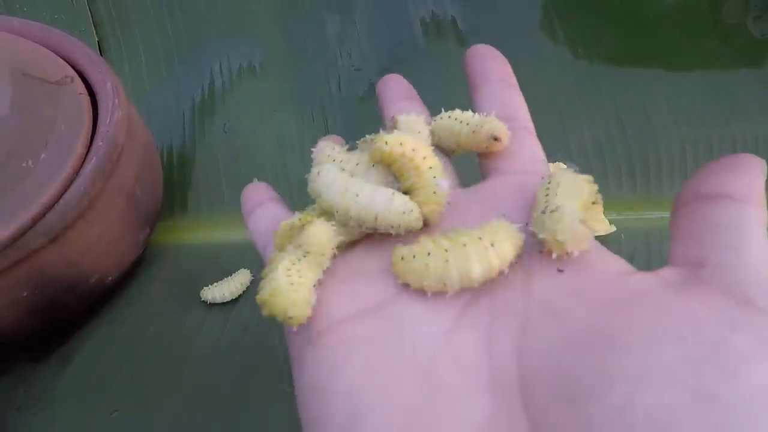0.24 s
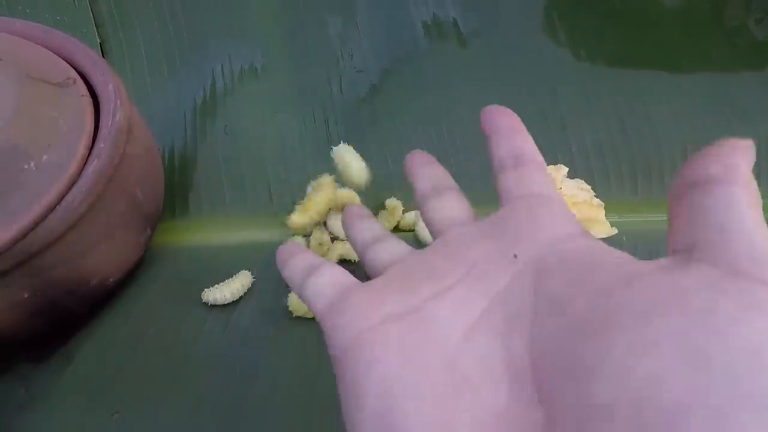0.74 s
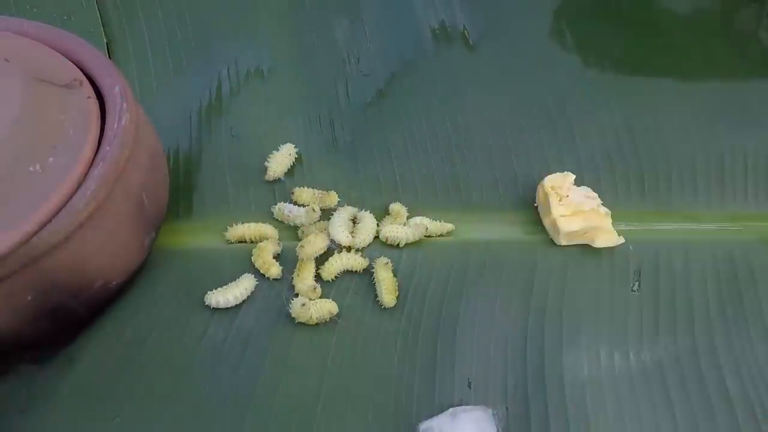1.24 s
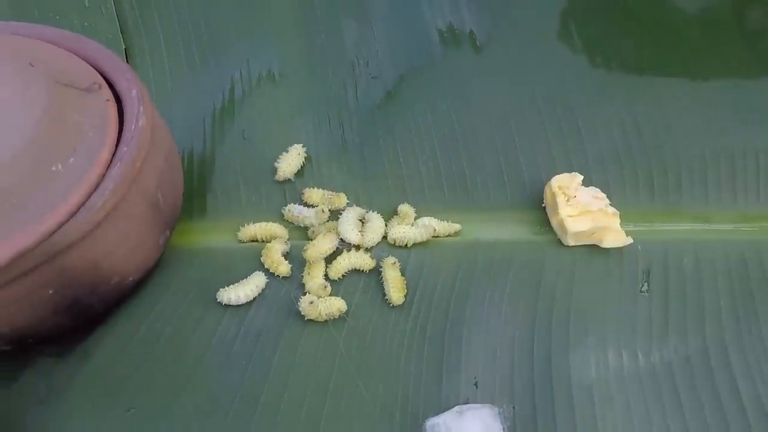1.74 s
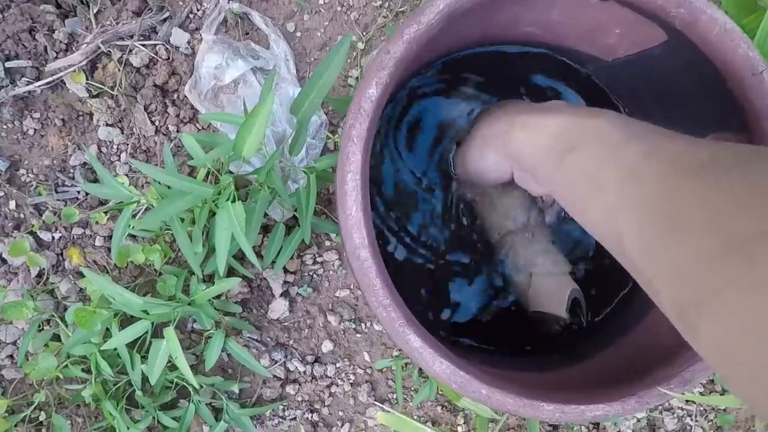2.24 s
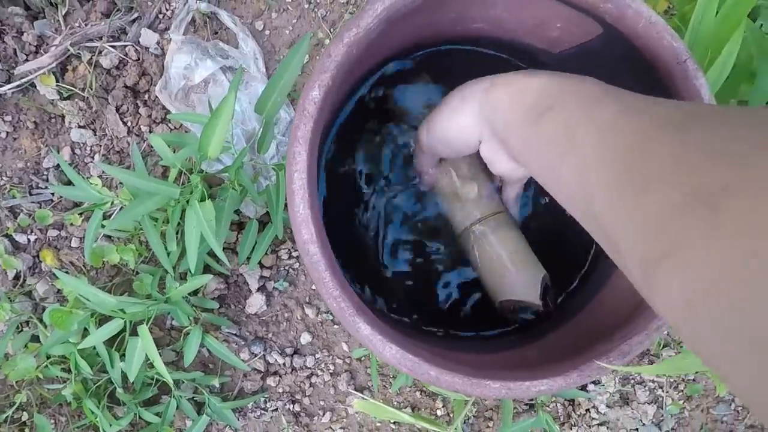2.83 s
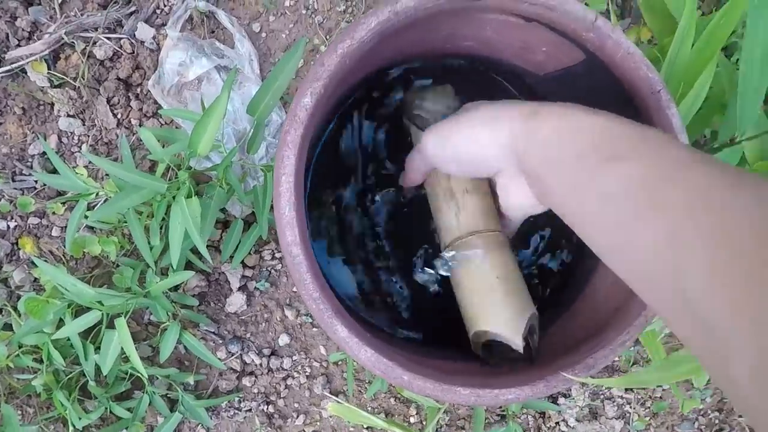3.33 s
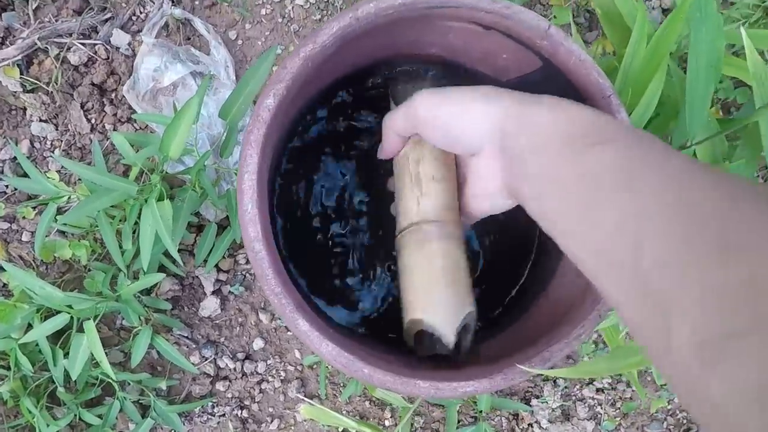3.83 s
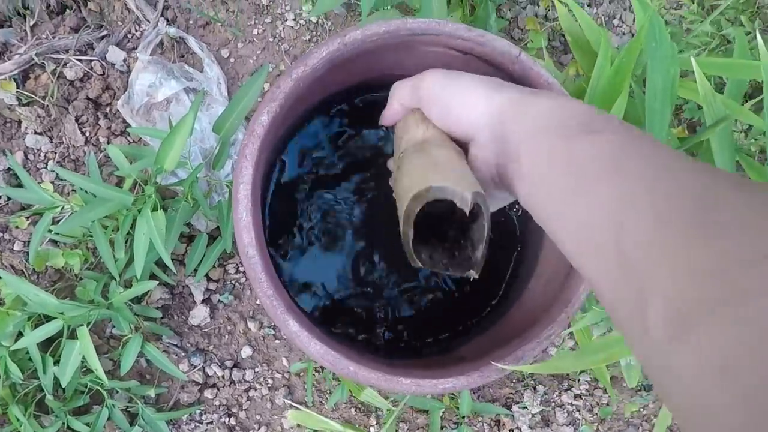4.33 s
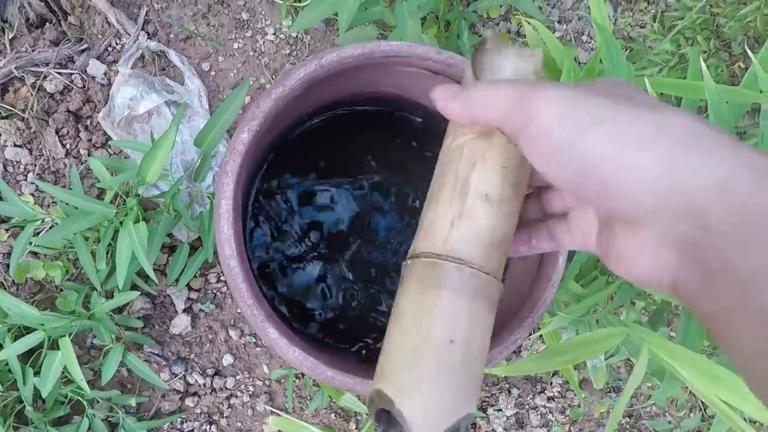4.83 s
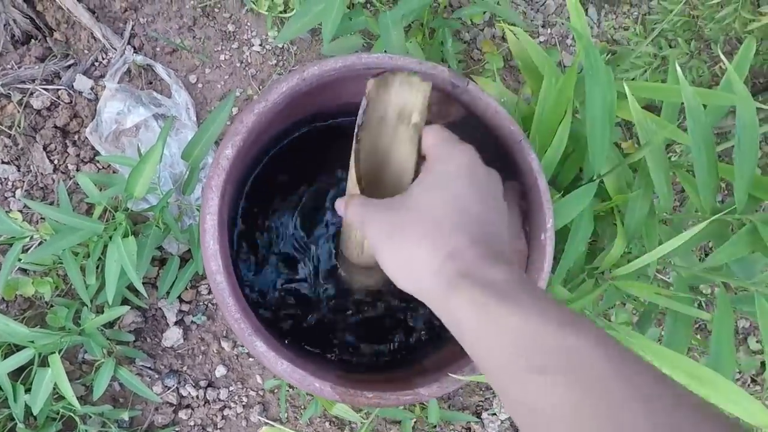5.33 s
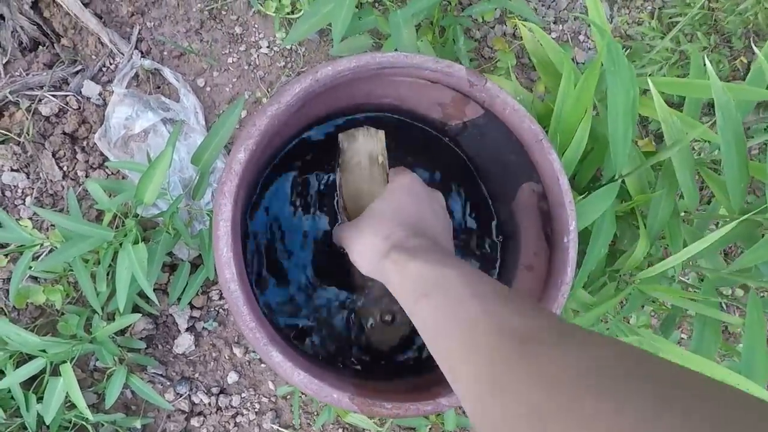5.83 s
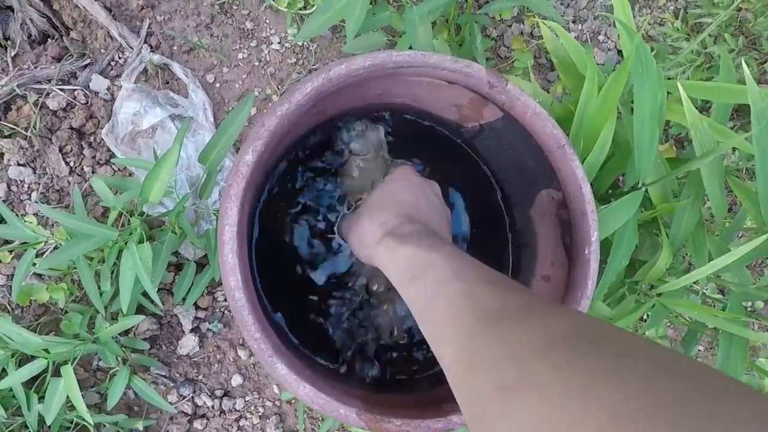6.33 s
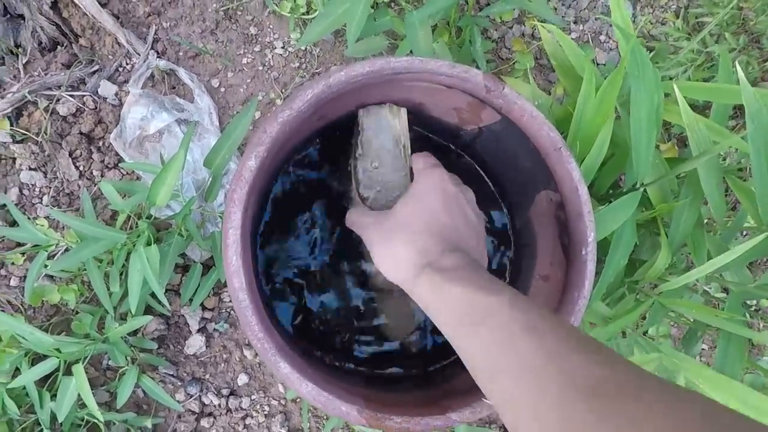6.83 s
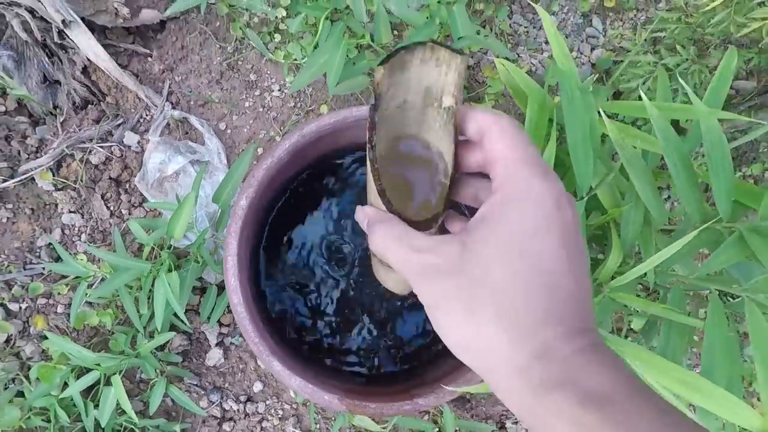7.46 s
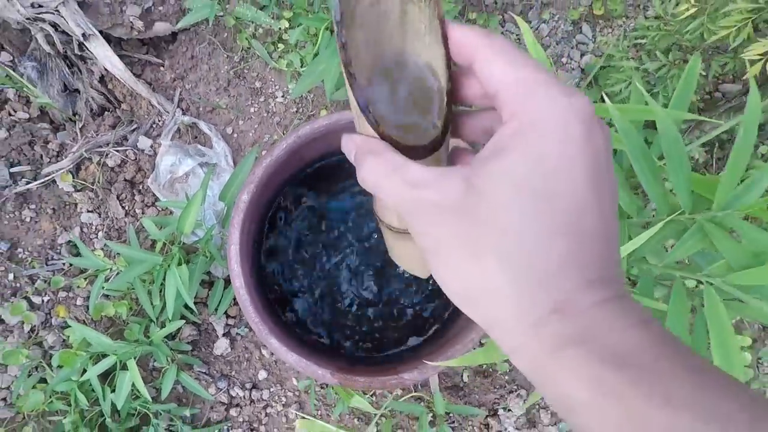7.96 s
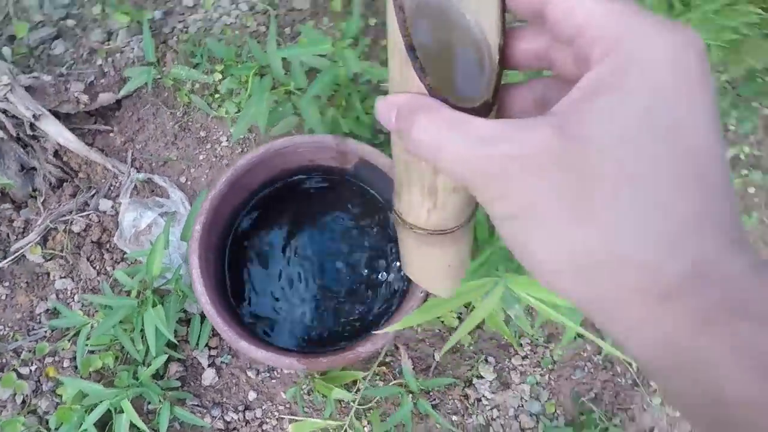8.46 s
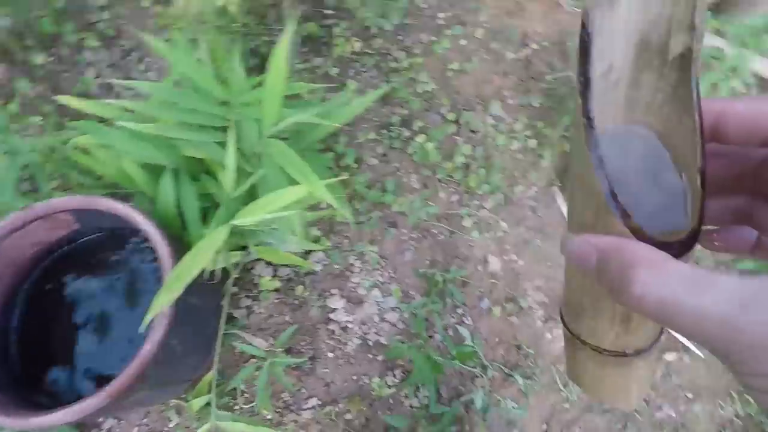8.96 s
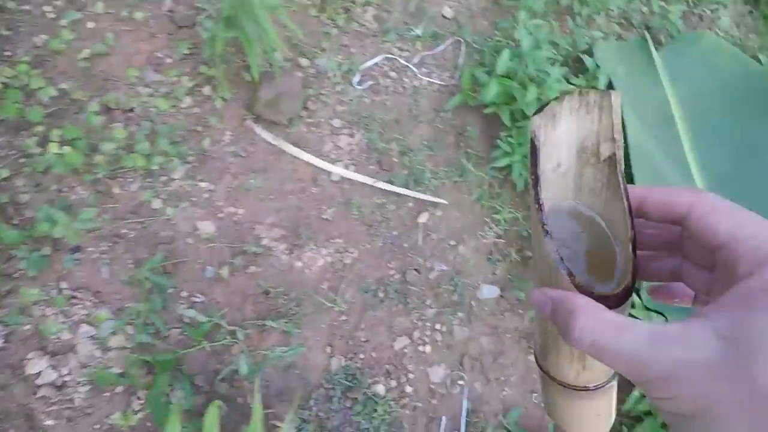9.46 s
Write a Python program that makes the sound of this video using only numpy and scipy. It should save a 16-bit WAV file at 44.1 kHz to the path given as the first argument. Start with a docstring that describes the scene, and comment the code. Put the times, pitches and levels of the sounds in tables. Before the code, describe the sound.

First a steady low hum with a few dull, papery pats on a leaf; it breaks off with a click. Close wet handling follows in a clay pot: hollow bamboo knocks, crisp ticks, plinking drops, then a cluster of rising bubble gulps. A distant engine putters closer behind it. Trickles and drips thin out, leaves swish once, and the engine recedes in open air.

```python
"""Outdoors over far traffic rumble: under a swelling motor hum, grubs pat onto a leaf and leaves rustle (noise
bursts). The scene changes, cutting the hum short, and a hollow drone fades; a bamboo tube knocks and rubs on a
clay pot of water (ringing modes), with short ringing notes and splash clicks, then gulps air (gliding sines) as
it fills, a slow engine drawing near. Lifted out, the tube drips (tiny chirps); leaves rustle once more as the
engine draws away."""
import sys
import numpy as np
from scipy import signal
from scipy.fft import rfft, irfft, next_fast_len
from scipy.io import wavfile

SR = 44100
rng = np.random.default_rng(int(sys.argv[2]) if len(sys.argv) > 2 else 0)


def master_out(mix):
    """Clip the mix to full scale and print it as 16-bit PCM to the path in sys.argv[1]."""
    frames = np.transpose(np.atleast_2d(mix))
    ceiling = np.clip(frames, -1, 1)
    pcm = np.round(ceiling * 32767).astype(np.int16)
    wavfile.write(sys.argv[1], SR, pcm)


N = 427329

# bamboo on clay: start_s, low_modes_peak_db, hardness_db (gain of upper modes), longest_t60_s
KNOCK_EVENTS = [(2.073, -13, -28.5, 0.011), (2.281, -23.5, -22, 0.039), (3.407, -15.5, -8, 0.09),
                (3.778, -24, -5, .08), (4.143, -27, 2, .08), (4.283, -28, -3.5, 0.055),
                (4.651, -9, 4.5, 0.095), (6.965, -20.5, 1, 0.019)]
# modes of tube and pot: mode_hz, level_db, t60_s
BODY_MODES = [(449, 8.5, 0.041), (807, -3, 0.093), (1160, 2.5, 0.0038), (1760, 2, 0.011), (2250, 0, 0.007),
              (2900, -2, 0.011), (3340, -6.5, 0.0085), (3820, -6.5, 0.0098)]
# short water tones, gliding or steady (gulped bubbles and ringing drops):
# start_s, peak_db, start_hz, rise_oct_per_s, life_s
WATER_TONES = [(1.957, -40, 1340, -0.5, 0.042), (1.992, -18.5, 1274, 8, 0.014),
               (2.037, -15, 443, 43, 0.015), (4.007, -24, 2150, -1, 0.0072), (4.19, -32, 763, -0.5, 0.059),
               (5.454, -25, 519, 0.6, 0.051), (5.958, -24.5, 218, 28, 0.047),
               (6.117, -28, 1015, 4.5, 0.055), (6.119, -23.5, 218, -2, 0.037), (6.156, -22, 197, 28, 0.054),
               (6.202, -22, 1154, 15.5, 0.0215), (6.204, -25.5, 2164, 28.5, 0.0096),
               (6.257, -8.5, 456, 43.5, 0.0175), (6.276, -23.5, 920, 79.5, 0.017),
               (6.278, -25, 962, -1, 0.021), (6.309, -21.5, 459, 20, 0.03), (6.349, -28, 943, 19.5, 0.0324),
               (6.38, -19.5, 299, 28.5, 0.066), (6.426, -34, 1000, 9, 0.036),
               (6.43, -12.5, 523, 46.5, 0.018), (6.602, -32, 440, 22, 0.015), (7.18, -20.5, 336, 17, 0.031),
               (7.662, -33.5, 1123, 37, 0.027), (8.331, -37.5, 383, 5, 0.12),
               (8.367, -34.5, 1326, 13.5, 0.034)]
# short ringing notes (drops into water, and the ring of struck pot or tube): start_s, peak_db, pitch_hz
RINGING_NOTES = [(3.409, -16, 1140), (3.628, -22, 1470), (3.699, -36, 1034), (3.734, -37, 2050),
                 (3.78, -39, 1350), (3.802, -31, 1690), (5.216, -36, 930), (5.273, -15, 440),
                 (5.35, -37, 734), (5.447, -19, 2095), (5.675, -35, 808), (6.144, -15, 481),
                 (6.204, -17, 460), (6.205, -26.5, 3560), (6.304, -36, 1605), (6.876, -21, 996),
                 (6.878, -22.5, 1400), (6.911, -36.5, 1454), (7.041, -34.5, 1550), (7.073, -28.5, 1955),
                 (7.087, -35, 2730), (7.136, -33.5, 1835), (7.149, -36, 3680), (7.171, -30.5, 1160),
                 (7.47, -36, 1080), (7.503, -22.5, 601), (7.543, -21.5, 1974)]
# splash clicks; a sharp one may take a second row for its high crack: start_s, peak_db, pitch_hz
TICK_EVENTS = [(1.943, -31.5, 3980), (2.273, -42, 2290), (3.073, -20.5, 3130), (3.2864, -30.5, 3900),
               (3.352, -40, 5900), (3.433, -17, 3300), (3.6046, -22.5, 2980), (3.757, -30, 2050),
               (3.9, -7.5, 3140), (3.9238, -9.5, 3870), (3.9263, -16, 6600), (4.2268, -31, 6000),
               (4.2276, -21, 13500), (4.366, -32.5, 4900), (4.804, -40, 5540), (5.216, -31, 5460),
               (5.444, -23, 2820), (5.549, -37.5, 5860), (6.059, -35.5, 5930), (6.116, -24.5, 3970),
               (6.189, -31, 4200), (6.302, -39.5, 6360), (6.379, -24.5, 2540), (6.506, -29, 5100),
               (6.572, -26, 4400), (6.834, -29, 1890), (6.9115, -25.5, 2900), (6.9632, -30, 2553),
               (7.126, -16.5, 4050), (7.172, -20.5, 4330), (7.2913, -30.5, 3670), (7.402, -33, 4200),
               (7.422, -23, 4400), (7.472, -26, 4300), (7.487, -28, 3600), (7.582, -29, 7500),
               (7.6288, -21, 4380), (7.718, -31.5, 5530), (7.746, -21, 2550), (7.925, -34, 4450),
               (8.223, -30.5, 4300), (8.4667, -34, 4330), (9.012, -39.5, 6000), (9.441, -34, 6000),
               (9.64, -27, 5900), (9.6758, -26, 3170)]
# washes of handling in the water: start_s, length_s, spray_db, rub_db (both relative)
SLOSH_EVENTS = [(1.896, 0.23, -68.5, -46), (2.33, 0.26, -68.5, -44), (3.421, 0.075, -48, -38),
                (3.657, 0.081, -54.5, -42), (3.792, 0.12, -49.5, -35.5), (3.896, 0.058, -38, -35.5),
                (4.13, 0.053, -51, -38.5), (4.646, 0.1, -51, -29), (5.102, 0.11, -55, -71),
                (5.203, 0.14, -57, -58), (5.382, 0.1, -59.5, -59), (6.027, 0.11, -60, -45),
                (6.171, 0.1, -57, -35), (6.257, 0.37, -63, -49), (6.813, 0.22, -64, -63),
                (6.954, 0.065, -56, -43.5), (7.033, 0.22, -57, -61), (7.328, 0.41, -51.5, -45.5)]
# last small drips off the lifted tube: time_s, gain_db
DRIP_GAIN = [(7.8, -53), (8.65, -56)]
# trickling water sounds one note of the tube: start_s, length_s, pitch_hz, coupling_db
TRICKLE_EVENTS = [(2.41, 0.12, 2500, -29), (3.875, 0.059, 1930, -29), (5.257, .17, 2100, -27.5),
                  (6.968, 0.81, 1930, -33), (7.503, 0.29, 595, -32)]
# grubs land on the leaf: start_s, peak_db
PAT_EVENTS = [(0.036, -18), (0.707, -18.5), (0.739, -18.5), (0.765, -21), (0.847, -24.5)]
# leaves rustle: loudest_s, level_db, swell_db_per_s, fade_db_per_s
SWISH_EVENTS = [(.84, -58.5, 75, 90), (8.77, -49, 127, 93)]
# rustle heard around its loudest moment: before_s, after_s
SWISH_SPAN_S = (.2, 0.51)
# motor hum that swells, cut short at the scene change: time_s, level_db
HUM_LEVEL = [(0, -31), (.43, -24.5), (.74, -31.5), (.88, -25.5), (1.04, -29.5), (1.42, -24.5),
             (1.919, -23.5)]
# hum overtones: multiple, mean_level_db
HUM_PARTIALS = [(2.621, -12), (3.762, -12.5)]
# slow engine drawing near and away: time_s, firings_per_s, level_db
ENGINE_COURSE = [(5.297, 19.8, -55.5), (5.902, 23.5, -40.5), (6.498, 21.6, -41), (7.6, 24, -34.5),
                 (8.8, 21.8, -39), (9.69, 21.7, -48.5)]
# orders of the firing rate: multiple, relative_level_db
ENGINE_PARTIALS = [(7, 5), (8, -5), (9, -2), (11, -5), (12, -7.5), (13, -9)]
# hollow far drone: time_s, level_db
DRONE_LEVEL = [(1.93, -35.5), (5.3, -50.5)]
# far traffic: time_s, deep_level_db, upper_level_db
TRAFFIC_LEVELS = [(0, -30.5, -42), (1.9, -31.5, -41.5), (1.95, -32, -37.5), (3.9, -35, -41.5),
                  (4.7, -43, -43.5), (5.8, -52, -43.5), (6.8, -64, -43.5), (7.5, -52, -43),
                  (8.3, -54.5, -46.5), (8.8, -46.5, -42.5), (9.69, -39.5, -45.5)]
# colour of the deep rumble: frequency_hz, relative_db_per_hz
DEEP_SPECTRUM = [(20, -2), (40, -11.5), (50, 3), (62, -15), (110, -8), (140, -29.5)]
# colour of the upper rumble: frequency_hz, relative_db_per_hz
UPPER_SPECTRUM = [(80, -39), (110, -17), (150, -5.5), (185, -6), (230, -14.5), (325, -16), (376, -14),
                  (486, -24), (1600, -42.5)]
# colour of leaves, insects and microphone hiss: frequency_hz, relative_db_per_hz
AIR_SPECTRUM = [(350, -8.5), (600, 2), (2720, -11.5), (6120, -25), (8270, -16.5), (9240, -10.5),
                (13000, 2.5), (14900, -27)]
# left-right correlation of the steady noise: frequency_hz, correlation (0 to 1)
STEREO_LIKENESS = [(50, 1), (500, 0.43), (2000, 0.027), (9000, 0.033)]

TONE_FADE_DB, BURST_S = -11.5, 0.007  # fade over a water tone's life; time of the closing fade
NOTE_RISE_OCT_PER_S = 0.4
NOTE_T60_S, NOTE_DAMPING = 0.075, 0.2  # t60 at 1 kHz; power of pitch that shortens it
WASH_CREST, WASH_HOLD = 0.36, 0.65  # shares of the length: peak, start of fall
HUM_HZ = 53.35
AIR_DB = -50.5
CUTOFF_HZ = 16300


def amp(db):
    """dB to amplitude factor."""
    return 10 ** (np.asarray(db) / 20)


def rms_one(x):
    """Scale to rms 1."""
    return x / np.sqrt(np.mean(x ** 2) + 1e-20)


def in_time(rows):
    """Interpolate the columns over the whole scene."""
    time_s, *columns = np.transpose(rows)
    return [np.interp(np.arange(N) / SR, time_s, c) for c in columns]


def while_it_lasts(rows):
    """Gain curves from dB columns, -120 dB outside the rows' span."""
    time_s, *columns = np.transpose(rows)
    t = np.arange(N) / SR
    return np.array([amp(np.interp(t, time_s, c, left=-120, right=-120)) for c in columns])


def at_hz(points, hz):
    """Interpolate a table over log frequency."""
    table = np.array(points)
    return np.interp(np.log(hz), np.log(table[:, 0]), table[:, 1])


def drift(rate_hz):
    """Slow random wander, rms 1: noise through a two-pole lowpass at 1/40 of the sample rate."""
    r = np.exp(-80 * np.pi * rate_hz / SR)
    noise = rng.standard_normal(N // 40 + 2002)
    slow = signal.lfilter([1], [1, -2 * r, r * r], noise)[2000:]  # drop the settling
    return np.interp(np.arange(N) / 40, np.arange(len(slow)), rms_one(slow))


def ring(x, hz, t60_s):
    """Two-pole resonator: a unit click starts a decaying sine of height 1."""
    r = amp(-60 / (t60_s * SR))
    w = 2 * np.pi * hz / SR
    return signal.lfilter([0, np.sin(w)], [1, -2 * r * np.cos(w), r * r], x + 1e-18)


def add(out, start_s, sound, peak_db):
    """Lay a short sound in at its time, scaled to its peak level."""
    i = round(start_s * SR)
    scaled = amp(peak_db) * sound / np.abs(sound).max()
    out[i:i + len(sound)] += scaled[:N - i]


def burst(noise, t60_s):
    """Exponentially decaying noise."""
    return noise * amp(-60 * np.arange(len(noise)) / SR / t60_s)


def grains(per_s, spread_db):
    """Random clicks of uneven size and either sign."""
    sizes = amp(spread_db * np.minimum(rng.exponential(1, N), 5)) * rng.choice([-1, 1], N)
    return sizes * (rng.random(N) < per_s / SR)


def body(push, hardness_db, longest_t60_s):
    """Modes of tube and pot; a harder contact reaches the upper ones, hand and water shorten the ring."""
    out = 0
    for k, (hz, db, t60_s) in enumerate(BODY_MODES):
        gain_db = db + (hardness_db if hz > 1400 else 0)
        out = out + amp(gain_db) * (-1) ** k * ring(push, hz, min(t60_s, longest_t60_s))
    return out


def knocks():
    """Bamboo on clay: each blow is a brief gritty contact that rings the modes."""
    out = np.zeros(N)
    noises = rng.standard_normal((len(KNOCK_EVENTS), 8000))
    for (start_s, low_db, hardness_db, longest_t60_s), noise in zip(KNOCK_EVENTS, noises):
        push = 0.32 * burst(noise, 0.017)
        push[0] = 1
        low = body(push, -60, longest_t60_s)
        sound = body(push, hardness_db, longest_t60_s)
        # the level sets the low modes, so hardness adds treble on top
        excess_db = 20 * np.log10(np.abs(sound).max() / np.abs(low).max())
        add(out, start_s, sound, low_db + excess_db)
    return out


def shivering_tone(hz, rise_oct_per_s, t60_s, attack_s, wobble, life_s, db):
    """A decaying sine, gliding like a bubble nearing the surface, that shivers and ends in a short fade."""
    t = np.arange(round(life_s * SR)) / SR
    shiver = np.interp(t, np.arange(len(wobble)) * 0.004, wobble)
    pitch_hz = hz * 2 ** (rise_oct_per_s * t + 0.05 * shiver)
    closing = np.clip((life_s - t) / BURST_S, 0, 1)
    jolt = 1 + amp(db + 22) * np.exp(-t * hz / 2.5)  # louder tones: first cycles stand out more
    decay = amp(-60 * t / t60_s + 3.5 * shiver[::-1])
    attack = 1 - np.exp(-t / attack_s)
    return np.sin(2 * np.pi * np.cumsum(pitch_hz) / SR) * jolt * decay * attack * closing


def water_tones():
    """Gulped bubbles, gliding until they burst, and steadier ringing drops; a fine spatter at each onset."""
    out = np.zeros(N)
    noises = rng.standard_normal((len(WATER_TONES), 1200))
    for (start_s, db, hz, rise, life_s), noise in zip(WATER_TONES, noises):
        t60_s = -60 * life_s / TONE_FADE_DB
        tone = shivering_tone(hz, rise, t60_s, 0.0004, noise[:150], life_s + BURST_S, db)
        add(out, start_s, tone, db)
        add(out, start_s, np.diff(burst(noise, 0.034)), db - 23)
    return out


def ringing_notes():
    """Drops into water and the ring of struck pot or tube: a short note behind a slap, duller for low notes."""
    out = np.zeros(N)
    noises = rng.standard_normal((len(RINGING_NOTES), 600))
    for (start_s, db, hz), noise in zip(RINGING_NOTES, noises):
        t60_s = NOTE_T60_S * (1e3 / hz) ** NOTE_DAMPING
        tone = shivering_tone(hz, NOTE_RISE_OCT_PER_S, t60_s, 0.000053, noise[-60:], t60_s, db)
        slap = ring(burst(noise, 0.015), 2.2 * hz, 3.0 / hz)
        spatter = np.diff(burst(noise, 0.025))
        add(out, start_s, tone, db)
        add(out, start_s, slap, db - 13)
        add(out, start_s, spatter, db - 20)
    return out


def ticks():
    """Splash clicks: a sharp wet crack with spatter behind it, ringing briefly at the row's pitch."""
    out = np.zeros(N)
    noises = rng.standard_normal((len(TICK_EVENTS), 2500))
    for (start_s, db, hz), noise in zip(TICK_EVENTS, noises):
        spatter = burst(noise, 0.028)
        spatter[1] += 4.0  # the crack
        snap = np.diff(spatter)
        add(out, start_s, rms_one(ring(snap, hz, 0.0043)) + 1.42 * rms_one(snap), db)
    return out


def wash(start_s, length_s, spray_db, rub_db):
    """Gains of spray and rubbing: a swell to the crest, a nearly level stretch, then a fall."""
    # share of length, spray dB, rub dB
    shape = [(0, -7, -9), (WASH_CREST, 0, 0), (WASH_HOLD, -1.5, -3), (1, -10, -19.5)]
    return while_it_lasts([(start_s + share * length_s, spray_db + a, rub_db + b) for share, a, b in shape])


def droplets(gain, low_hz, octaves, count):
    """Tiny bubbles at random moments and pitches, each chirping upwards."""
    when, size, pitch, chirp = rng.random((count, 4)).T
    at = (when * (N - 900)).astype(int)
    t = np.arange(900) / SR
    heard = gain[at] > 1e-4
    at, size, pitch, chirp = at[heard], size[heard], pitch[heard], chirp[heard]
    hz = low_hz * 2 ** (octaves * pitch[:, None])
    cycles = hz * t * (1 + 9.0 * chirp[:, None] ** 2 * t)
    decay = amp(-60 * hz * t / 65.0)  # 60 dB in 65 cycles of the start pitch
    sounds = np.sin(2 * np.pi * cycles) * decay * np.hanning(1800)[900:]
    loudness = amp(-4.5 * np.log(size + 0.045))  # few loud, many soft
    out = np.zeros(N)
    np.add.at(out, at[:, None] + np.arange(900), (gain[at] * loudness)[:, None] * sounds)
    return out


def slosh():
    """Spray: droplets over fizz, in clumps. Rubbing and running water: dense grit on the modes. Late drips."""
    spray_gain, rub_gain = sum(wash(*row) for row in SLOSH_EVENTS)
    clumps = amp(3.5 * drift(35))
    fizz_band = signal.butter(1, [1800, 9000], "band", fs=SR, output="sos")
    fizz = rms_one(signal.sosfilt(fizz_band, grains(9800, spread_db=7.0)))
    grit = rms_one(grains(5000, spread_db=3.0))
    rub = body(grit * clumps * rub_gain, 0.1, longest_t60_s=0.82)
    spray = droplets(clumps * spray_gain, low_hz=1100, octaves=2.5, count=9000)
    spray += amp(-7) * fizz * clumps * spray_gain
    drips = droplets(while_it_lasts(DRIP_GAIN)[0], low_hz=2940, octaves=1.17, count=160)
    return spray + amp(-26.5) * rub + drips


def trickles(water):
    """The air in the tube rings to the water running past."""
    out = np.zeros(N)
    for start_s, length_s, hz, db in TRICKLE_EVENTS:
        gain = while_it_lasts([(start_s, db), (start_s + length_s, db)])[0]
        out += ring(water * gain, hz, 0.087)
    return out


def pot_echo(x):
    """A few quick echoes off pot wall and ground, other ones on each side."""
    out = np.zeros((2, N))
    lags = (rng.uniform(0.00037, 0.0092, 10) * SR).astype(int)
    for k, lag in enumerate(lags):
        out[k % 2, lag:] += (-1) ** (k // 2) * amp(-900 * lag / SR) * x[:-lag]  # -0.9 dB per ms
    return out


def pats():
    """A soft body on a stretched leaf: a dull thump under a papery snap."""
    out = np.zeros(N)
    noises = rng.standard_normal((len(PAT_EVENTS), 3000))
    for (start_s, db), noise in zip(PAT_EVENTS, noises):
        snap = burst(noise, 0.043)
        papery = rms_one(ring(snap, 3150, 0.0047))
        dull = 11.0 * rms_one(ring(snap, 400, 0.002))
        thump = 7.8 * rms_one(ring(snap, 213, 0.14))
        add(out, start_s, papery + dull + thump, db)
    return out


def swish():
    """Leaves: broad grainy rustle, mostly treble, swelling and fading steadily."""
    grit = grains(9000, spread_db=4.0)
    rustle = rms_one(ring(grit, 8700, 0.00018)) + 1.2 * rms_one(ring(grit, 680, 0.00056))
    before_s, after_s = SWISH_SPAN_S
    gain = np.zeros(N)
    for peak_s, db, swell, fade in SWISH_EVENTS:
        start = (peak_s - before_s, db - swell * before_s)
        end = (peak_s + after_s, db - fade * after_s)
        gain += while_it_lasts([start, (peak_s, db), end])[0]
    return rustle * gain


def hum():
    """Motor: a firm low tone with weaker wavering overtones; at the scene change it stops short in mid swing,
    with a click."""
    turns = 2 * np.pi * HUM_HZ * (np.arange(N) / SR - HUM_LEVEL[-1][0])
    tone = -np.cos(turns)  # at full swing where it breaks off
    for multiple, db in HUM_PARTIALS:
        level = amp(db + 3.7 * drift(5.1))
        tone = tone + level * np.sin(multiple * turns + 0.84 * drift(16.0))
    return np.sqrt(2) * tone * while_it_lasts(HUM_LEVEL)[0]


def engine():
    """Orders of the firing rate, each wavering a little on its long way."""
    turns = 2 * np.pi * np.cumsum(in_time(ENGINE_COURSE)[0]) / SR
    orders = np.zeros(N)
    for k, db in ENGINE_PARTIALS:
        level = amp(db + 2.2 * drift(2.6))
        phase = rng.uniform(0, 2 * np.pi) + 0.39 * drift(1)
        orders += level * np.sin(k * turns + phase)
    level_rows = np.array(ENGINE_COURSE)[:, ::2]
    return rms_one(orders) * while_it_lasts(level_rows)[0]


def drone():
    """Noise in one narrow low resonance."""
    return rms_one(ring(rng.standard_normal(N), 179.3, 0.18)) * while_it_lasts(DRONE_LEVEL)[0]


def stereo_noise(spectrum):
    """Steady coloured noise, rms 1, the two sides less alike towards the treble."""
    size = next_fast_len(N)
    hz = np.maximum(np.arange(size // 2 + 1) * SR / size, 1)
    mid, side = rfft(rng.standard_normal((2, size)))
    alike = np.clip(at_hz(STEREO_LIKENESS, hz), 0, 1)
    in_band = (hz >= spectrum[0][0]) * (hz <= spectrum[-1][0])
    colour = amp(at_hz(spectrum, hz)) * in_band
    pair = np.sqrt(1 + alike) * mid + np.sqrt(1 - alike) * side * np.array([[1], [-1]])
    return rms_one(irfft(colour * pair, size)[:, :N])


def scene():
    """Near sounds in the middle, the hum and far sounds a little to the left, air all round."""
    water = ticks() + slosh()
    near = knocks() + water_tones() + ringing_notes() + water + trickles(water) + pats() + swish()
    # the lows wrap round and echo little
    bright = signal.sosfilt(signal.butter(1, 900, "high", fs=SR, output="sos"), near)
    deep_db, upper_db = in_time(TRAFFIC_LEVELS)
    deep = amp(deep_db) * stereo_noise(DEEP_SPECTRUM)
    upper = amp(upper_db) * stereo_noise(UPPER_SPECTRUM)
    far = deep + upper + engine() + drone()
    air = amp(AIR_DB) * stereo_noise(AIR_SPECTRUM)
    close = near + amp(-8) * pot_echo(bright)
    return close + hum() * amp([[1.8], [-1.8]]) + far * amp([[0.5], [-0.5]]) + air


def record(dry):
    """The microphone ports resonate in the treble and fall away above; the top is cut."""
    r = np.exp(-np.pi * 1500 / SR)  # 1500 Hz wide
    w = 2 * np.pi * 6300 / SR
    port = signal.lfilter((1 - r * r) / 2 * np.array([1, 0, -1]), [1, -2 * r * np.cos(w), r * r], dry)
    dull = signal.sosfilt(signal.butter(2, 8000, fs=SR, output="sos"), dry + 5.77 * port)
    top_cut = signal.cheby2(12, 70, CUTOFF_HZ, fs=SR, output="sos")
    return signal.sosfilt(top_cut, dull + 0.39 * dry)


dry = scene()
out = record(dry)
master_out(out)
```